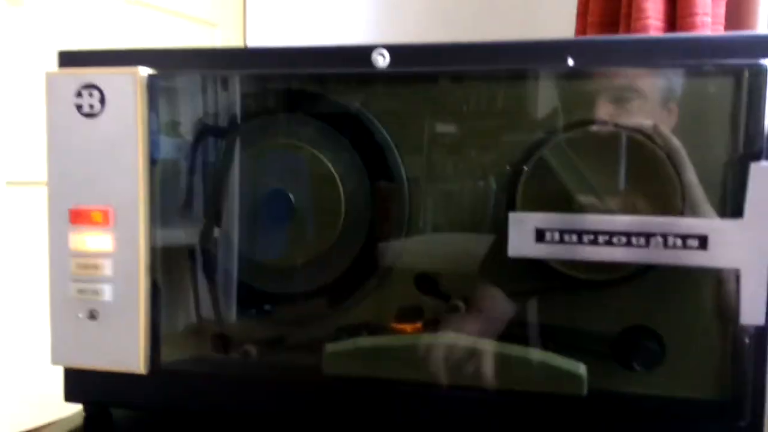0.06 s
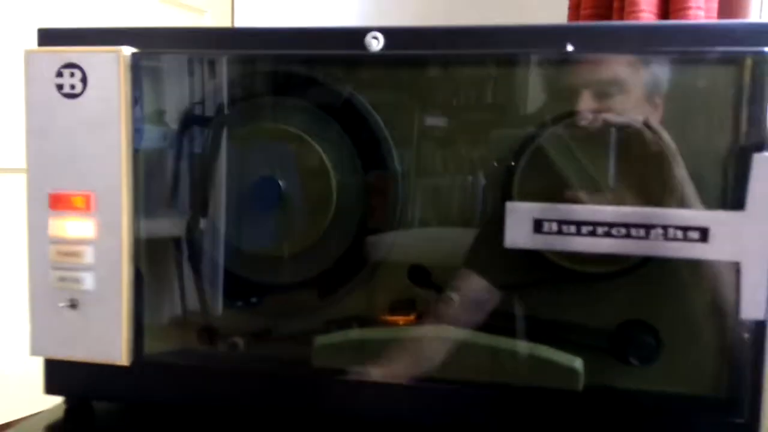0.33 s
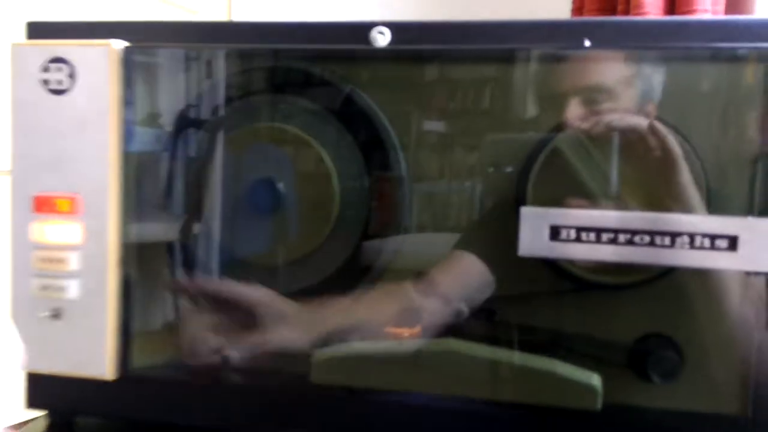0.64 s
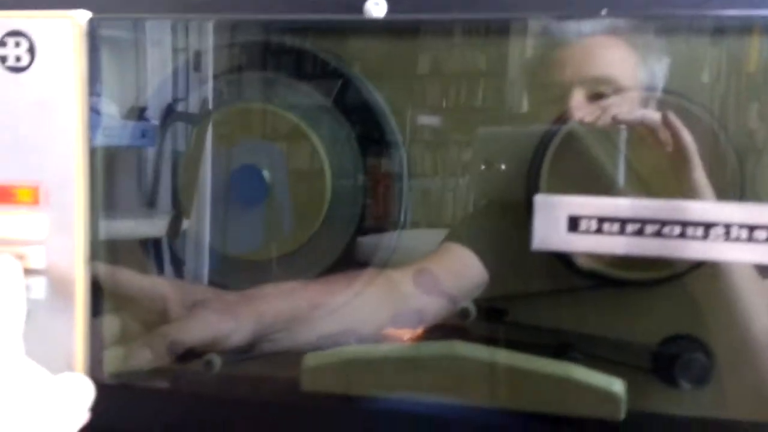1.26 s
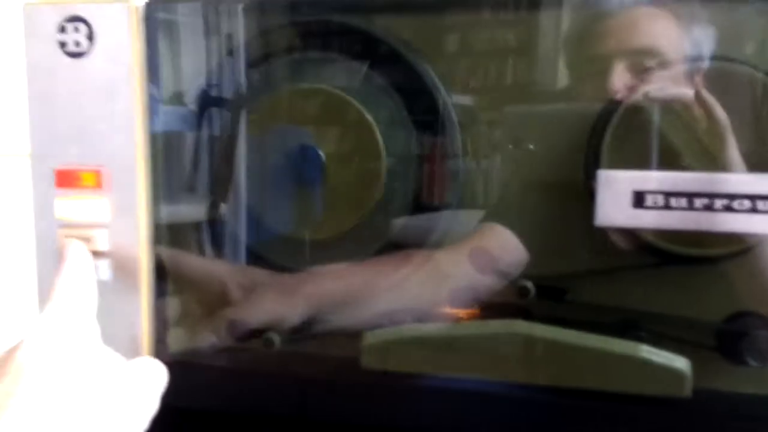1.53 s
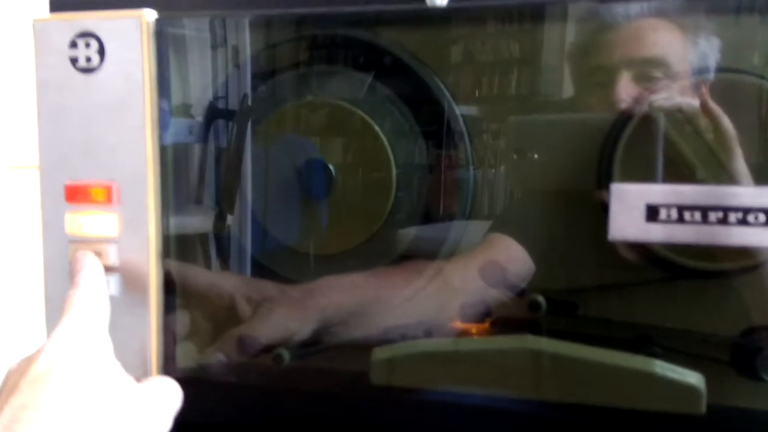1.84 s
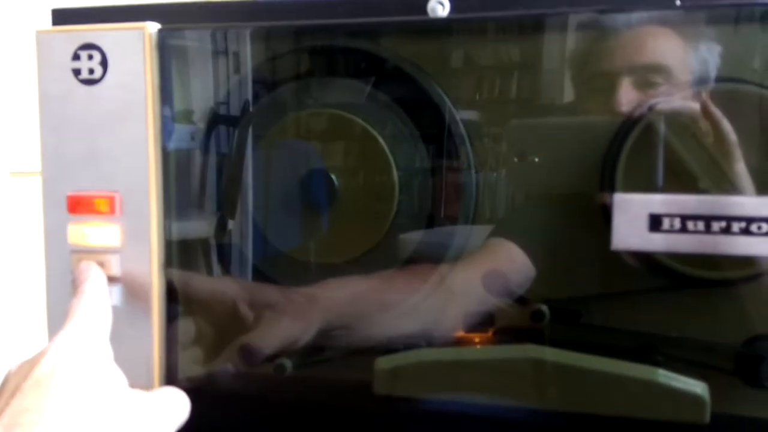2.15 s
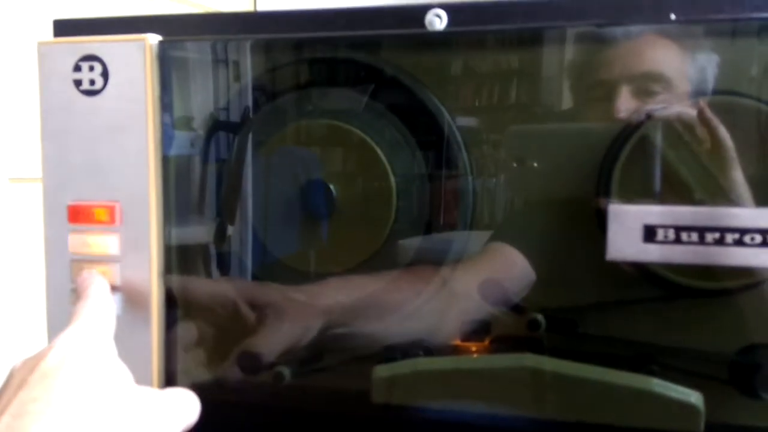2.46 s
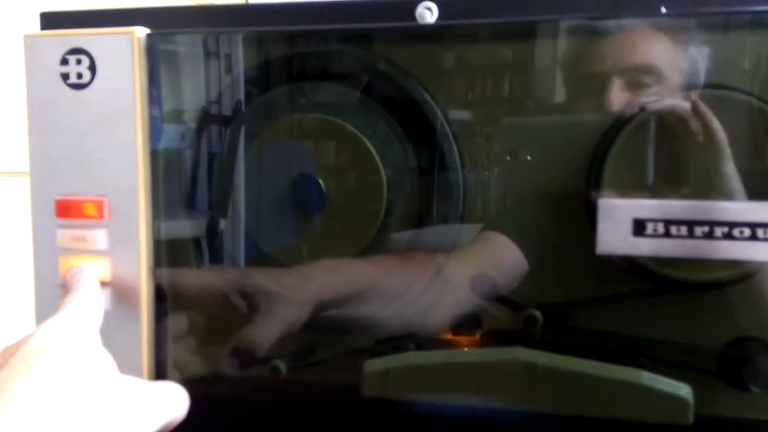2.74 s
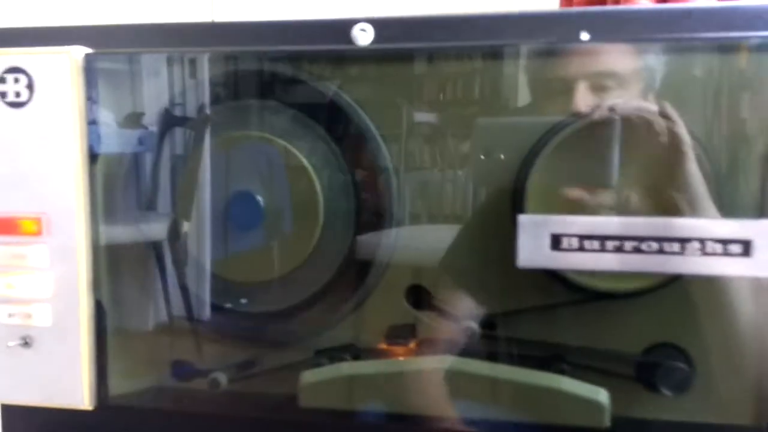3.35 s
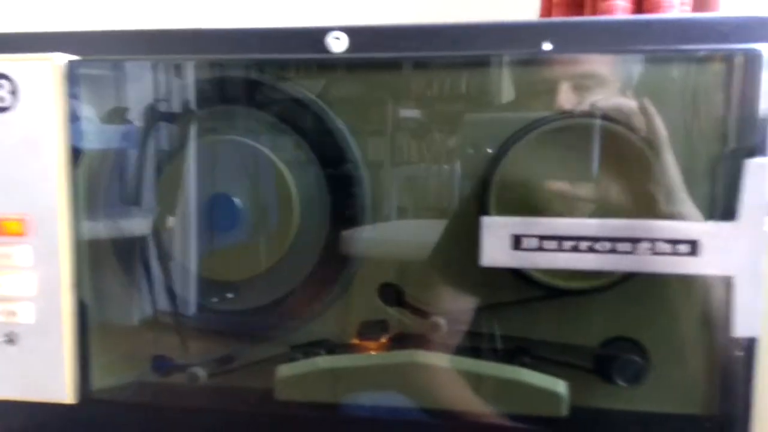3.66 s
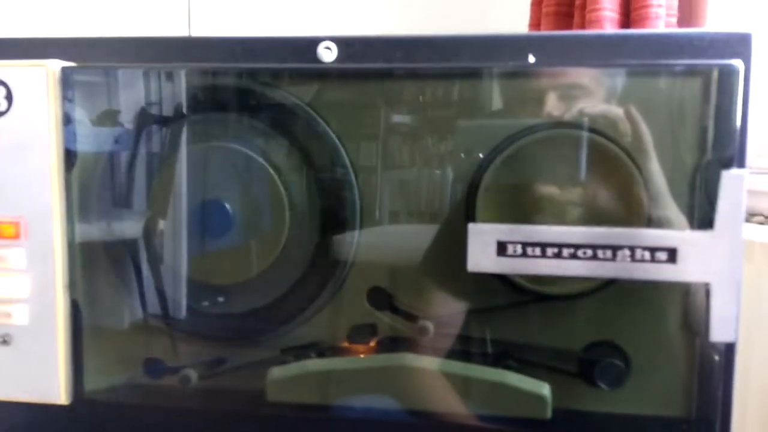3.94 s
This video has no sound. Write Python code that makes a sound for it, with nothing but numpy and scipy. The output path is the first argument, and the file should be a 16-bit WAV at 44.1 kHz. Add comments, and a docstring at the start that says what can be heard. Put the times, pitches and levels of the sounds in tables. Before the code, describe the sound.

Buttons click, then a tape machine's motors kick in, snap the tape taut and whirr.

```python
"""An old computer tape drive starting up in a small room. At first a faint fan hum and a thin, wavering
high hiss are heard; a hand rubs past close to the microphone and a button clicks. The reel motors kick
in and run up, and the slack tape snaps taut. The reels whirr on inside the ringing cabinet, with the
motors' low drone and whine and the hiss of tape over its guides. A hollow scuff swells up near the end."""
import sys
import numpy as np
from scipy import signal
from scipy.fft import rfft, irfft, next_fast_len
from scipy.io import wavfile
from scipy.ndimage import uniform_filter1d, map_coordinates

SR = 44100
rng = np.random.default_rng(int(sys.argv[2]) if len(sys.argv) > 2 else 0)


def to_wav(sig):
    """Store sig (one row per channel, or 1-D mono) as 16-bit WAV at the path in sys.argv[1].

    Samples outside -1..1 are clipped; the rate is SR.
    """
    pcm = np.clip(np.atleast_2d(sig), -1, 1) * 32767
    pcm = np.round(pcm).astype(np.int16)
    wavfile.write(sys.argv[1], SR, pcm.T)  # frames by channels


N = 176400

# Likeness of the microphone's left and right sides: freq_hz, correlation
STEREO_LIKENESS = [(60, 0.95), (250, 0.92), (450, 0.97), (800, 0.62), (1500, 0.12), (5000, 0.085),
                   (12000, 0.039)]
# Idling fan's tones: pitch_hz, level_db (all levels are relative)
FAN_TONES = [(199.2, -81.5), (231.5, -91.5), (328.4, -75), (430.7, -73), (489.9, -71.5), (807.5, -85),
             (1077, -86)]
# Course of a thin, high hiss: time_s, level_db
SIZZLE_LEVELS = [(0, -56.5), (.025, -53), (.08, -66), (.2, -76.5), (.35, -71.5), (.45, -83), (.48, -66.5),
                 (.57, -74.5), (.75, -86), (1.1, -61), (1.19, -72), (1.33, -60.5), (1.56, -83),
                 (1.67, -66.5), (1.83, -85), (2.12, -72.5), (2.35, -65.5), (2.52, -62.5), (2.6, -77)]
# Spectra of the fan's air and the thin hiss: freq_hz, level_db
FAN_SPECTRUM = [(25, -26), (65, -7), (125, -12.5), (200, -4.5), (300, 0.5), (450, -11), (600, -10.5),
                (820, -5), (1050, -5.5), (1300, -18), (2000, -19), (5000, -25.5), (9000, -16.5),
                (15500, -21)]
SIZZLE_SPECTRUM = [(5000, -26.5), (7000, -6.5), (8600, 6), (10300, -9.5), (11700, 5), (12600, -19),
                   (15500, -13)]

# Sleeve brushes and hand rubs by the microphone: start_s, length_s, level_db
SLEEVE_BRUSHES = [(0.566, 0.43, -60), (2.198, 0.075, -59), (2.398, 0.073, -57.5)]
HAND_RUBS = [(0.828, .056, -45), (0.893, 0.09, -42.5), (1.013, 0.017, -47), (1.069, 0.0071, -50.5),
             (1.09, .006, -49), (3.808, 0.18, -52), (3.91, .1, -42)]
# Dull knocks of the case: start_s, length_s, level_db, t60_s
CASE_THUMPS = [(1.085, 0.014, -44.5, 0.13), (2.626, 0.036, -46, 0.13)]
# Soft, low bumps of the hand: start_s, level_db
HAND_BUMPS = [(1.1, -67), (1.32, -77), (2.24, -72)]
# Spectra of these four handling sounds: freq_hz, level_db
BRUSH_SPECTRUM = [(710, -32), (1200, -5.5), (1780, -11), (2120, -1.5), (4150, -17), (6110, -1.5),
                  (8070, -0.5), (11200, -2.5), (15500, -16)]
RUB_SPECTRUM = [(25, -38), (42, -18), (62, -3.5), (90, -10), (145, -28), (190, -6.5), (255, -9.5),
                (328, 2.5), (375, -12), (428, 1), (550, -12.5), (740, -8), (815, -14.5), (920, -6),
                (1130, -14), (1340, -13.5), (1690, -21), (2130, -14), (2350, -16), (2880, -20), (3100, -24),
                (3600, -26.5), (4600, -23.5), (6200, -20.5), (7000, -23), (7500, -50), (9900, -52),
                (15000, -62)]
THUMP_SPECTRUM = [(120, -28), (230, -8), (295, 14), (345, -6), (450, -9), (800, -30), (2500, -80)]
BUMP_SPECTRUM = [(25, -28), (55, -5), (75, -3), (120, -20), (250, -36)]

# Finger on the button: start_s, level_db, t60_s, knock_pitch_hz
BUTTON_CLICKS = [(1.074, -49, .05, 885), (1.287, -56.5, 0.12, 765), (2.205, -59.5, 0.11, 854),
                 (2.424, -57.5, 0.19, 690)]
# Ring of the button's panel: pitch_hz, level_db, t60_s
PANEL_MODES = [(1220, -7, 0.11), (1440, -9, 0.12), (2570, -10, .06), (3330, -9, 0.055)]
# Sharp, hard contacts: start_s, level_db
HARD_TICKS = [(1.076, -47), (1.287, -55), (2.204, -51.5), (2.4253, -43.5)]
# Spectra of a click's crunch and a hard contact: freq_hz, level_db
CLICK_SPECTRUM = [(60, -6), (150, -16), (350, 0), (750, 0), (1100, -5), (1450, -4), (2000, -10),
                  (3200, -10), (5000, -16), (9000, -6.5), (15000, -48)]
TICK_SPECTRUM = [(300, -23), (2000, -5), (3500, -6), (6000, -1), (9000, 7), (15000, -8)]

# Ring of the motors' kick: pitch_hz, level_db, t60_s
KICK_MODES = [(288, -65, 0.29), (440, -56.5, 0.56), (2320, -55, 0.41), (2440, -53, 0.19)]
# Course of the motor drone: time_s, pitch_hz, level_db
DRONE_COURSE = [(2.61, 148.7, -97), (2.72, 167.1, -45), (2.81, 179.2, -46), (2.86, 180.2, -33),
                (2.91, 181.5, -50.5), (3.0, 180.8, -30), (3.15, 181.9, -31.5), (3.28, 183.4, -28.5),
                (3.42, 182.4, -31), (3.77, 183.3, -29), (4.0, 181.5, -28.5)]
# Partials of the drone: harmonic_number, level_db
DRONE_HARMONICS = [(1, -2.5), (2, -30.5), (4, -29)]
# Steady tones of the running motors: pitch_hz, level_db
WHINE_TONES = [(283, -67), (332, -58), (376, -59), (431, -58.5), (491, -63.5), (693, -65), (731, -61),
               (949, -55), (1444, -60), (1736, -66), (1814, -56), (2305, -76), (2364, -54), (2681, -56.5),
               (2710, -60.5), (2767, -58.5)]
# The reels running up: time_s, whirr_db, hiss_db
REEL_LEVELS = [(2.606, -100, -100), (2.613, -52, -56), (2.69, -48.5, -55), (2.74, -44, -48.5),
               (2.82, -40.5, -45), (3.03, -41, -44), (3.15, -40.5, -45), (3.77, -42, -43.5),
               (3.82, -45.5, -48), (3.87, -42, -47.5), (4.0, -44.5, -47)]
# Treble of the tape hiss, relative to the hiss: time_s, level_db
FIZZ_LEVELS = [(2.6, -1), (3.79, -2), (3.85, -9.5), (4.0, -13)]
# Cabinet resonances: centre_hz, width_hz, level_db
CABINET_MODES = [(704, 40, -1), (852, 25, 0), (935, 42, -1), (1320, 44, -5.5), (1436, 30, -8),
                 (1745, 36, -1.5), (1815, 32, -1), (2340, 66, -7), (2650, 50, -8), (4700, 110, -8)]
# Spectra of the panel boom, reel whirr, tape hiss and its treble: freq_hz, level_db
BOOM_SPECTRUM = [(25, -39), (45, -32), (70, -18), (84, -7), (96, -30), (114, 4), (126, 1), (150, -10.5),
                 (200, -5.5), (235, -20.5), (290, -27), (600, -53)]
WHIRR_SPECTRUM = [(120, -36.5), (215, -6.5), (300, -18), (380, -20), (520, -24), (700, -11), (790, -16.5),
                  (900, -12.5), (1000, -17.5), (1200, -18.5), (1400, -15.5), (1790, -15.5), (2000, -17.5),
                  (2370, -15), (2560, -21), (3200, -27), (4200, -56)]
HISS_SPECTRUM = [(2600, -26), (3100, -13.5), (3450, -3), (3750, -12), (4100, -12), (4450, -6), (4750, -1),
                 (5100, -4.5), (5800, -7), (6400, 0.5), (7000, -5.5), (7800, -19.5), (9000, -50)]
FIZZ_SPECTRUM = [(6000, -48), (7100, -2), (8800, -0.5), (9800, -7), (12000, -10.5), (15000, -13.5),
                 (16000, -24)]
# Balance of the running drive at the microphone: freq_hz, left_minus_right_db
DRIVE_BALANCE = [(60, 10.5), (140, -5), (210, 1), (500, 0.5), (720, 2.5), (900, -2), (1100, 1), (1400, 1.5),
                 (1790, 7.5), (2100, 1.5), (2360, 6), (2740, -0.5), (4190, 0), (6400, 2.5), (9800, 6.5),
                 (15000, 4)]

# Tape pulled taut: start_s, level_db, t60_s
TAPE_CRACKS = [(2.9334, -24, 0.0032), (2.9343, -23.5, .004)]
# Ring of the tension arm: pitch_hz, level_db, t60_s
ARM_MODES = [(1550, -26.5, .008), (2350, -23, .03), (5750, -20, .006), (8940, -21, .004),
             (12950, -28, .003), (14700, -29, .003)]
# Spectra of the tape's crack, the struck deck and the late scuff: freq_hz, level_db
CRACK_SPECTRUM = [(200, -25), (900, -8), (1500, 6), (2300, 2), (3600, -8), (4700, 1), (5900, 6), (7200, -8),
                  (8900, 5), (10500, -15), (13000, -5), (16000, -1.5)]
DECK_SPECTRUM = [(150, -41), (600, -3), (850, 6.5), (1100, 2), (1480, 6), (2000, 3.5), (3500, 0),
                 (4200, -9.5), (4700, -3.5), (6500, -5.5), (7600, -8), (9000, -9), (10200, -20),
                 (15000, -23)]
SCUFF_SPECTRUM = [(250, -26), (370, 1.5), (480, 0), (580, 2.5), (700, -22), (1050, -6), (1500, -16),
                  (2500, -46)]


def amp(db):
    return 10 ** (np.asarray(db) / 20)


def unit_rms(x):
    return x / np.sqrt(np.mean(x ** 2) + 1e-20)


def clock():
    return np.arange(N) / SR


def along(points, hz):
    """Interpolate (freq_hz, value) points on a log frequency axis."""
    freqs, values = np.transpose(points)
    return np.interp(np.log(hz + 1), np.log(freqs + 1), values)


def curves(rows):
    """One value per sample for each column after the time."""
    times, *columns = np.transpose(rows)
    return [np.interp(clock(), times, column) for column in columns]


def wobble(rate_hz):
    """A smooth random curve, rate_hz knots a second."""
    return map_coordinates(rng.standard_normal(int(N * rate_hz / SR) + 4), [clock() * rate_hz])


def filtered(x, response):
    """Apply a gain given as a function of frequency."""
    size = next_fast_len(N + SR // 2)
    return irfft(rfft(x, size) * response(np.fft.rfftfreq(size, 1 / SR)), size)[..., :N]


def pan(db):
    """Left and right gains for a level difference; positive is left."""
    return amp(np.array([[.5], [-.5]]) * db)


def stereo_angle(hz):
    """Spread between the sides in radians: small in the bass, wide in the treble."""
    return np.arccos(np.clip(along(STEREO_LIKENESS, hz), -1, 1)) / 2


def noise(response, grain_db=0):
    """Stereo noise of rms 1, nearly mono in the bass; grain_db breaks it into tiny contacts."""
    source = rng.standard_normal((2, N)) * amp(grain_db * wobble(700))
    spread = lambda hz: np.array([np.cos(stereo_angle(hz)), np.sin(stereo_angle(hz))])
    mid, side = filtered(source, lambda hz: response(hz) * spread(hz))
    return unit_rms(np.array([mid + side, mid - side]))


def rush(spectrum, grain_db=0):
    """Stereo noise with a given spectrum."""
    return noise(lambda hz: amp(along(spectrum, hz)), grain_db)


def stroke(start_s, attack_s, hold_s, t60_s):
    """Envelope that rises from start_s and begins to die away hold_s later."""
    age = clock() - start_s
    return np.clip(age / attack_s, 0, 1) * amp(-60 * np.maximum(age - hold_s, 0) / t60_s)


def tone(hz, drift_hz, flutter_db):
    """An unsteady sine; high ones reach the microphone's two sides out of step."""
    phase = 2 * np.pi * np.cumsum(hz + drift_hz * wobble(14)) / SR
    skew = stereo_angle(hz) * np.array([[1], [-1]])
    return np.sqrt(2) * np.sin(phase + skew) * amp(flutter_db * wobble(17))


def reflections(x, t60_s, wet_db):
    """Add dense reflections from the cabinet and the small room, thin in the bass."""
    t = np.arange(SR // 3) / SR
    tail = rng.standard_normal((2, len(t))) * amp(-60 * t / t60_s)
    wet = signal.fftconvolve(x, tail / np.linalg.norm(tail[0]), axes=1)[:, :N]
    wet = filtered(wet, lambda hz: hz ** 2 / (hz ** 2 + 600 ** 2))
    return (x + amp(wet_db) * wet) / np.hypot(1, amp(wet_db))


def ripple(x, depth_db=3, spacing_hz=74.6):
    """Many small cabinet resonances colour the treble, differently on each side."""
    knots = rng.standard_normal((2, 2000))

    def response(hz):
        peaks = np.array([map_coordinates(side, [hz / spacing_hz], mode="wrap") for side in knots])
        return amp(depth_db * np.clip((hz - 1500) / 3000, 0, 1) * peaks)

    coloured = filtered(x, response)
    return coloured * x.std() / coloured.std()


def patchy(x, depth_db):
    """The colour of a rushing sound shifts from moment to moment."""
    frames = signal.stft(x, nperseg=1024)[2]
    patches = uniform_filter1d(rng.standard_normal(frames.shape[1:]), size=4, axis=0)
    patches = unit_rms(uniform_filter1d(patches, size=9, axis=1))
    return unit_rms(signal.istft(frames * amp(depth_db * patches), nperseg=1024)[1][:, :N])


def idling_fan():
    """The fan hums faintly over the soft noise of its air."""
    hum = sum(amp(db) * tone(hz, drift_hz=0.84, flutter_db=2) for hz, db in FAN_TONES)
    return hum + amp(-71.5) * rush(FAN_SPECTRUM)


def sizzle():
    """A thin, high hiss wavers to the microphone's right."""
    sizzle_db, = curves(SIZZLE_LEVELS)
    return amp(sizzle_db - 7) * pan(db=-18) * rush(SIZZLE_SPECTRUM)


def hand():
    """A sleeve brushes and a hand rubs and bumps close to the microphone; the case knocks dully."""
    brushes = sum(amp(db) * stroke(s, 0.15, length, 0.29) for s, length, db in SLEEVE_BRUSHES)
    rub_power = sum((amp(db) * stroke(s, 0.0035, length, 0.18)) ** 2 for s, length, db in HAND_RUBS)
    thumps = sum(amp(db) * stroke(s, 0.0097, length, t60) for s, length, db, t60 in CASE_THUMPS)
    bumps = sum(amp(db) * stroke(s, 0.017, 0.031, 0.7) for s, db in HAND_BUMPS)
    slips = unit_rms(amp(wobble(160)))
    skin = np.sqrt(rub_power) * slips * rush(RUB_SPECTRUM, grain_db=0.5)
    sleeve = brushes * rush(BRUSH_SPECTRUM, grain_db=1)
    return ripple(skin + sleeve) + bumps * rush(BUMP_SPECTRUM) + thumps * rush(THUMP_SPECTRUM)


def button():
    """Each click is a crunch and a hollow knock that rings the panel; hard contacts add a bright tick."""
    presses = sum(amp(db) * stroke(s, 0.00066, 0.006, t60) for s, db, t60, _ in BUTTON_CLICKS)
    crunch = presses * rush(CLICK_SPECTRUM, grain_db=2.5)
    knock = sum(amp(db - 6) * stroke(s, 0.0028, 0.0016, 0.19) * tone(hz, drift_hz=7.9, flutter_db=2)
                for s, db, _, hz in BUTTON_CLICKS)
    ring = 0
    for hz, mode_db, t60 in PANEL_MODES:
        strikes = sum(amp(db + mode_db - 7) * stroke(s, 0.00091, 0, t60) for s, db, *_ in BUTTON_CLICKS)
        ring += strikes * tone(hz, drift_hz=40.7, flutter_db=1)
    contacts = sum(amp(db) * stroke(s, 0.00028, 0.00034, 0.0079) for s, db in HARD_TICKS)
    ticks = contacts * pan(db=7) * rush(TICK_SPECTRUM)
    return reflections(crunch + ring, t60_s=0.3, wet_db=-9) + knock + ticks


def motor_kick(start_s=2.609):
    """The motors start with a ringing kick, and the tape rasps as it jerks over its guides."""
    ring = sum(amp(db) * stroke(start_s, 0.0073, 0.009, t60) * tone(hz, drift_hz=10, flutter_db=2)
               for hz, db, t60 in KICK_MODES)
    rasp = amp(-50) * stroke(start_s, 0.001, 0.003, 0.077) * rush(TICK_SPECTRUM, grain_db=3)
    return ring + rasp


def motors(turn_s=0.354, crest_s=3.4, swell_depth_db=2.5):
    """The motors' drone climbs to pitch under a steady whine; the panels boom once a turn."""
    pitch_hz, drone_db = curves(DRONE_COURSE)
    phase = 2 * np.pi * np.cumsum(pitch_hz + 1.644 * wobble(16)) / SR
    harmonics = np.sqrt(2) * sum(amp(db) * np.sin(k * phase) for k, db in DRONE_HARMONICS)
    drone = harmonics * amp(drone_db + 0.75 * wobble(23.83))
    whirr_db, _ = curves(REEL_LEVELS)
    effort = amp(whirr_db - whirr_db.max())
    whine = effort * sum(amp(db - 1.05) * tone(hz, drift_hz=1.525, flutter_db=2.5)
                         for hz, db in WHINE_TONES)
    swell_db = swell_depth_db * np.cos(2 * np.pi * (clock() - crest_s) / turn_s)
    boom = effort ** 1.41 * amp(-42 + swell_db) * rush(BOOM_SPECTRUM)
    return drone + whine + boom


def reels():
    """Bearing chatter rings the cabinet in surges, harder with speed; tape hisses over its guides."""
    whirr_db, hiss_db = curves(REEL_LEVELS)
    fizz_db, = curves(FIZZ_LEVELS)
    resonance = lambda hz, width: noise(lambda f: 1 / (1 + ((f - hz) / width * 1.6) ** 2), grain_db=3.5)
    panels = sum(amp(db + 1.6 * wobble(14)) * resonance(hz, width) for hz, width, db in CABINET_MODES)
    ringing = amp(-2.5 + 0.75 * (whirr_db - whirr_db.max())) * unit_rms(panels)
    whirr_gain = amp(whirr_db + 1.27 * wobble(24.84))
    chatter = amp(-0.5) * patchy(rush(WHIRR_SPECTRUM, grain_db=1.5), depth_db=2.5)
    hiss_gain = amp(hiss_db + 0.27 * wobble(60))
    hiss = amp(1.5) * patchy(rush(HISS_SPECTRUM, grain_db=0.5), depth_db=3)
    fizz = amp(fizz_db) * patchy(rush(FIZZ_SPECTRUM, grain_db=-1), depth_db=2)
    running = whirr_gain * (chatter + ringing) + hiss_gain * (hiss + fizz)
    return ripple(reflections(running, t60_s=0.11, wet_db=-5.5))


def tape_snap(rebound_s=2.9492):
    """The slack runs out: a crack rings the tension arm, which clacks back against the rattling deck."""
    taut_s = TAPE_CRACKS[0][0]
    jerks = sum(amp(db) * stroke(s, 0.0001, 0.0004, t60) for s, db, t60 in TAPE_CRACKS)
    cracks = jerks * rush(CRACK_SPECTRUM)
    arm = sum(amp(db) * stroke(taut_s, 0.0003, 0.0007, t60) * tone(hz, drift_hz=30.2, flutter_db=2)
              for hz, db, t60 in ARM_MODES)
    rattle = amp(-32) * stroke(taut_s, 0.0057, 0.03, 0.34) * rush(DECK_SPECTRUM, grain_db=1.5)
    rebound = amp(-25.5) * stroke(rebound_s, 0.0004, 0.001, 0.022) * rush(DECK_SPECTRUM)
    return reflections(cracks + arm, t60_s=0.16, wet_db=-12) + ripple(rattle + rebound)


def scuff(start_s=3.81):
    """A hollow rubbing swells up late in the run."""
    return amp(-40.5) * stroke(start_s, 0.15, 0.2, 0.2) * rush(SCUFF_SPECTRUM, grain_db=4)


def scene():
    """The room from the microphone's position, with the running drive a little to the left."""
    drive = motor_kick() + motors() + reels() + tape_snap()
    drive = filtered(drive, lambda hz: pan(along(DRIVE_BALANCE, hz)))
    return drive + hand() + scuff() + button() + idling_fan() + sizzle()


def record(dry):
    """The microphone chain passes nothing above its band limit."""
    band_limit_hz = 15800
    return filtered(dry, lambda hz: hz < band_limit_hz)


dry = scene()
out = record(dry)
to_wav(out)
```